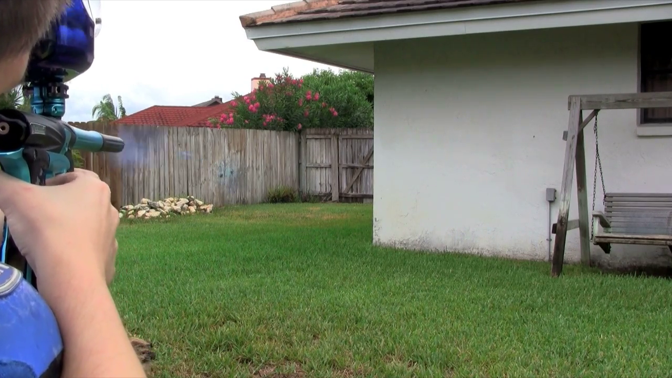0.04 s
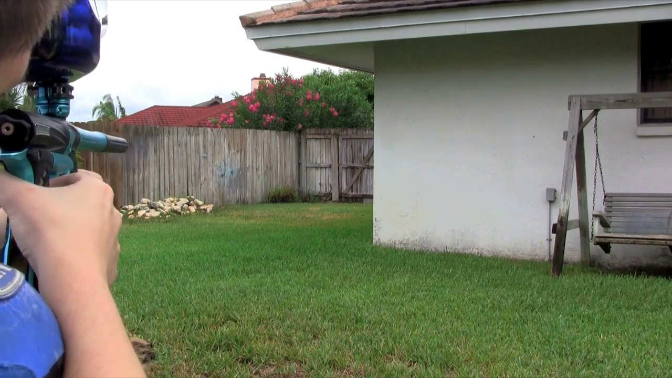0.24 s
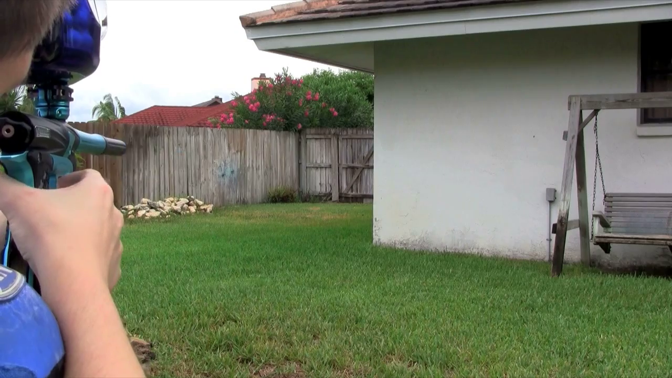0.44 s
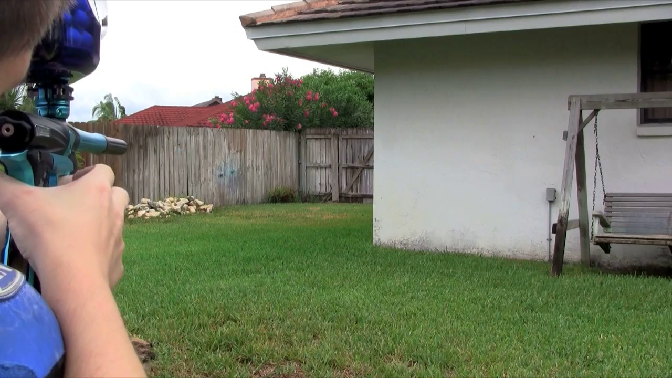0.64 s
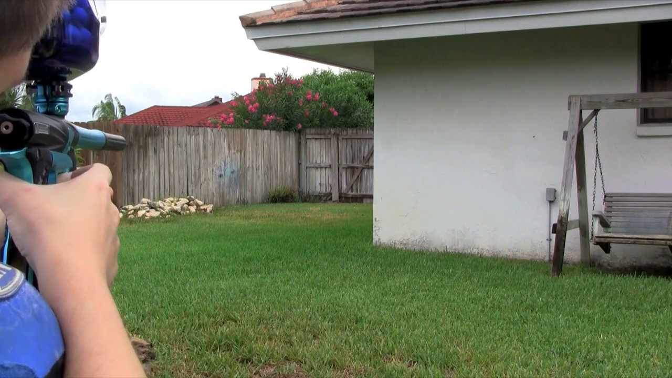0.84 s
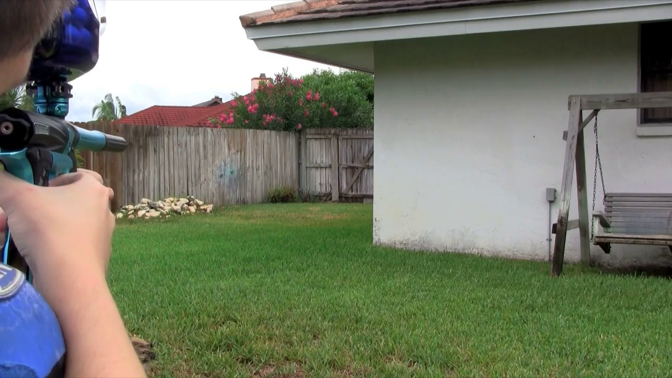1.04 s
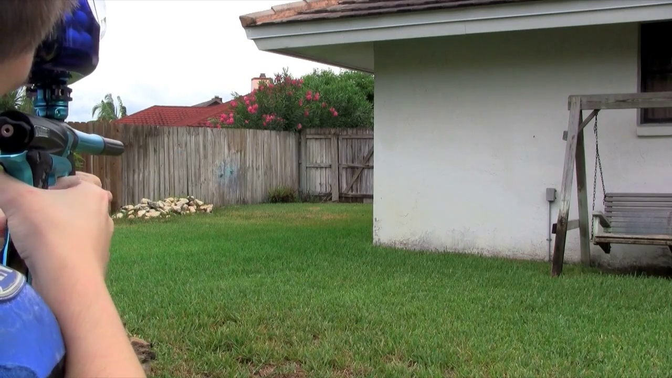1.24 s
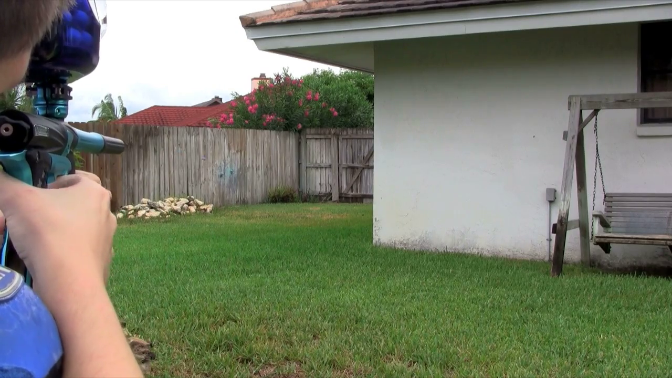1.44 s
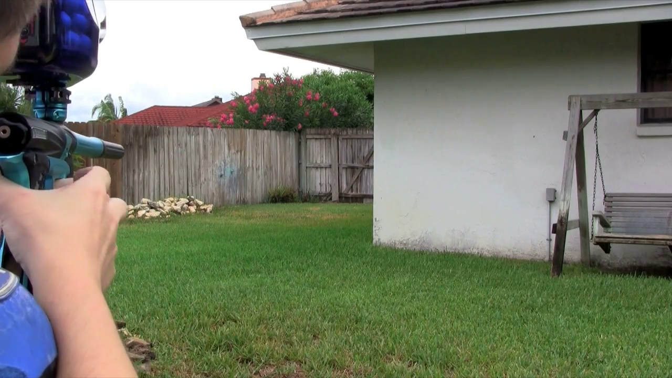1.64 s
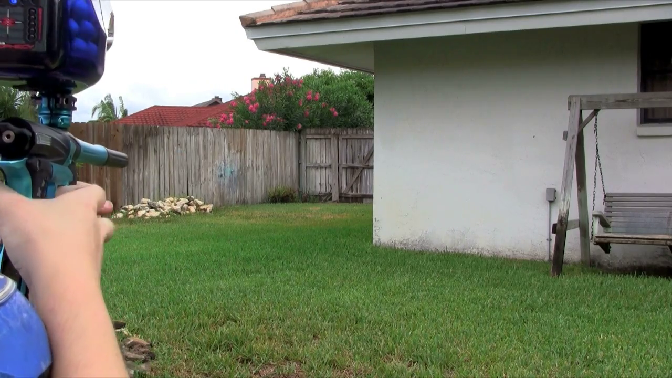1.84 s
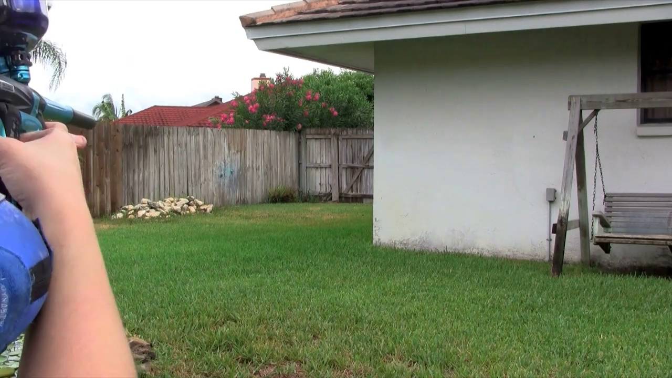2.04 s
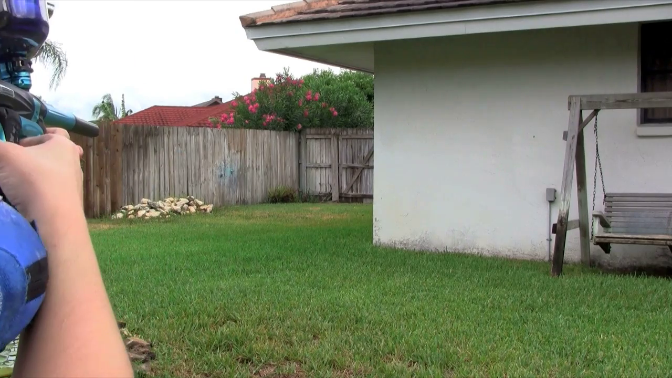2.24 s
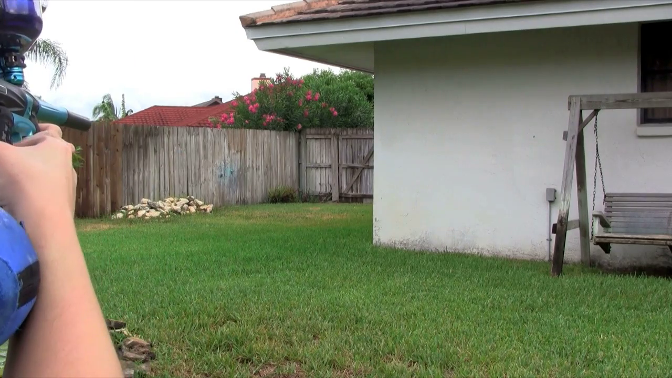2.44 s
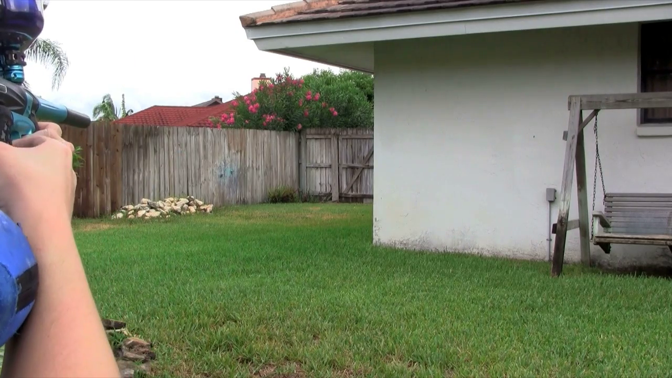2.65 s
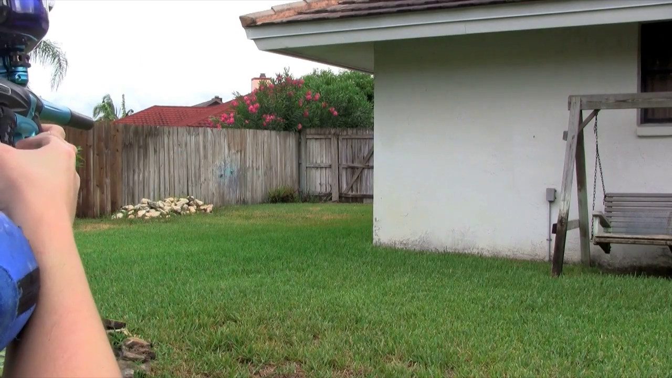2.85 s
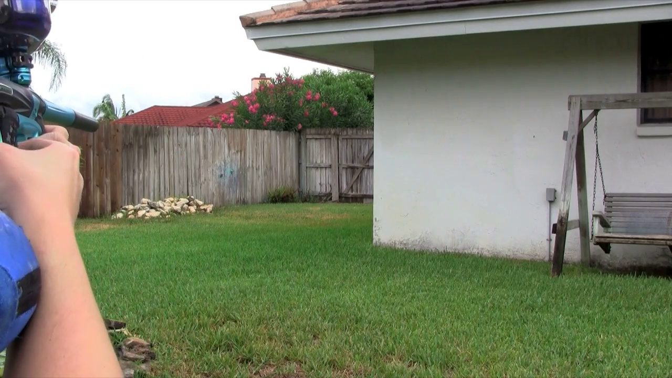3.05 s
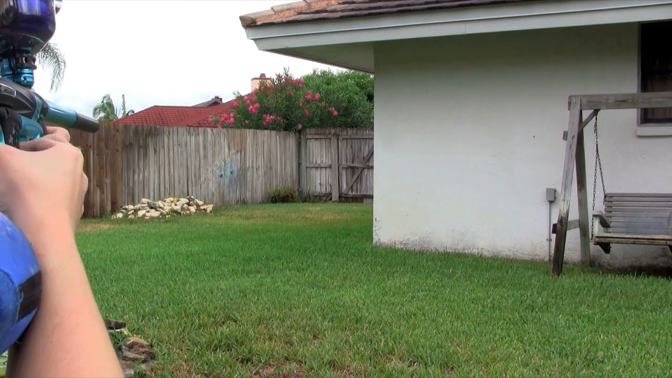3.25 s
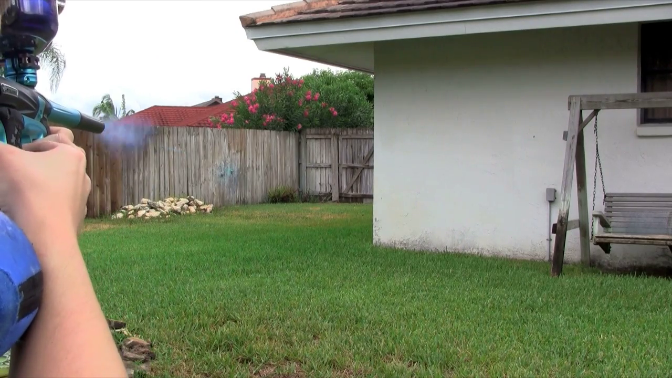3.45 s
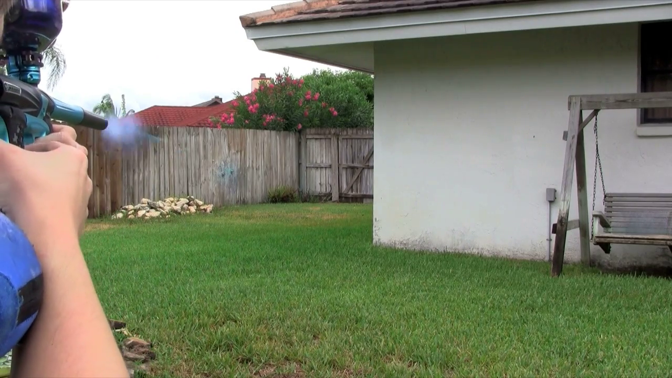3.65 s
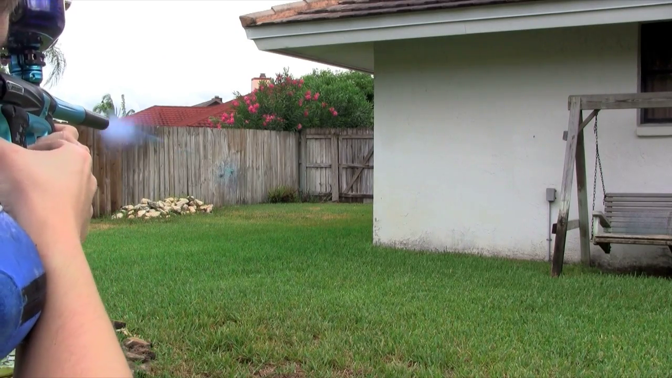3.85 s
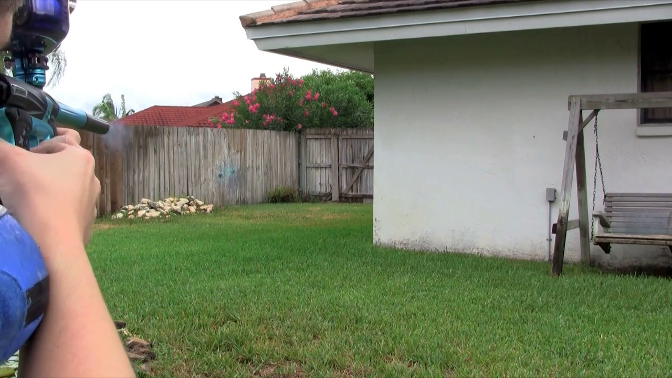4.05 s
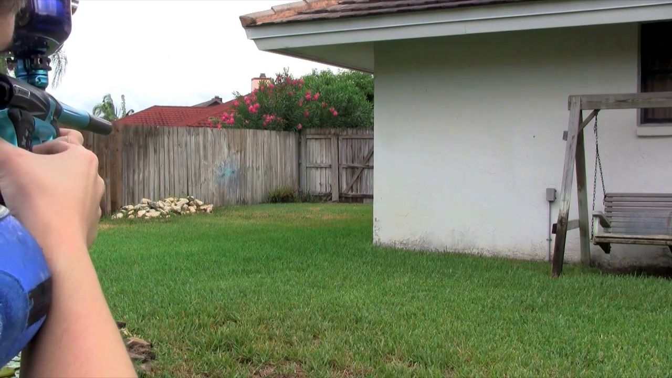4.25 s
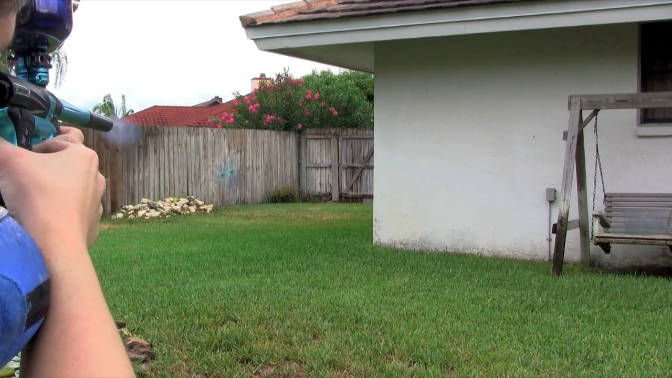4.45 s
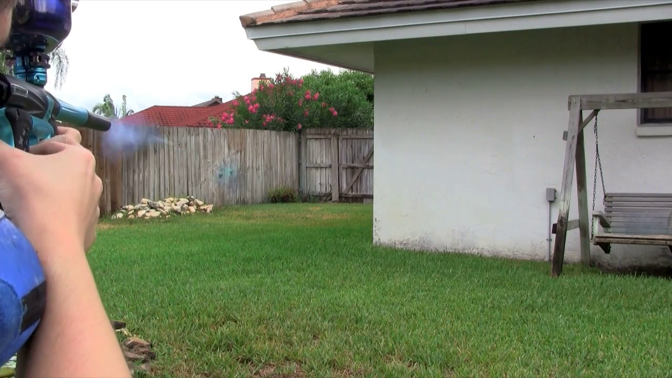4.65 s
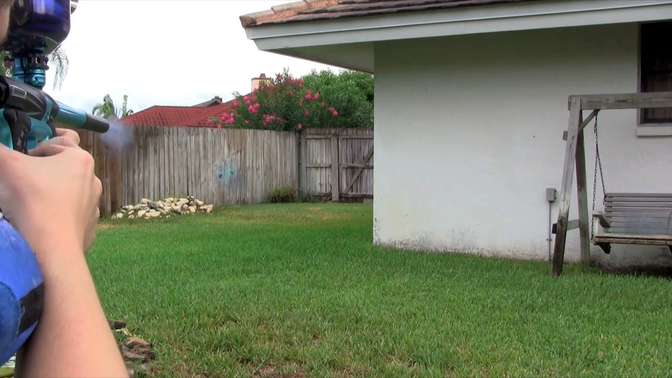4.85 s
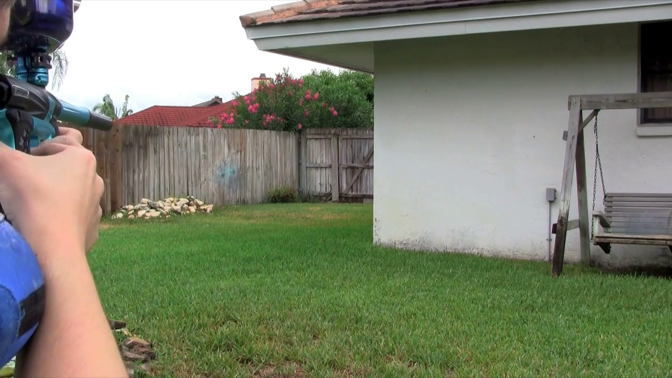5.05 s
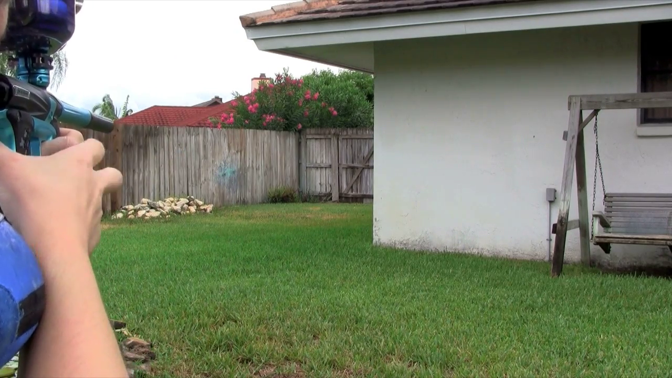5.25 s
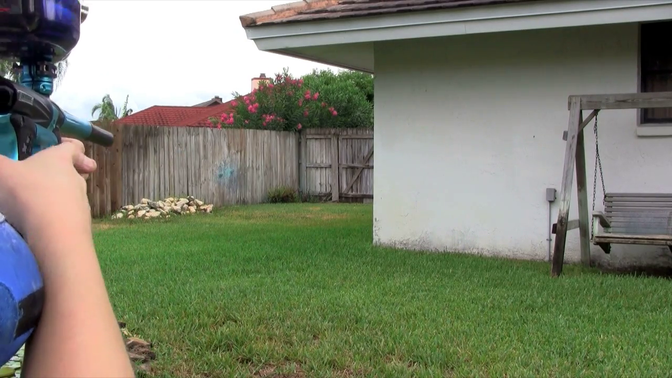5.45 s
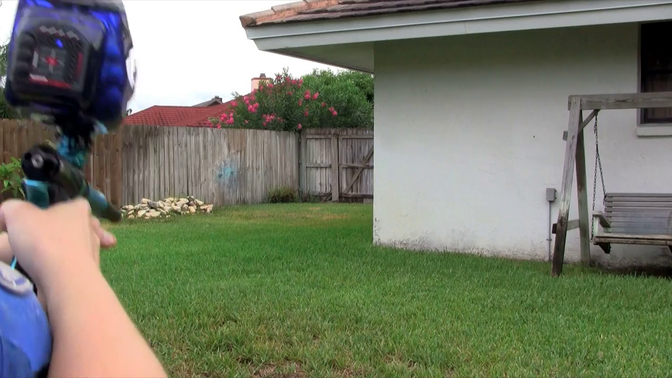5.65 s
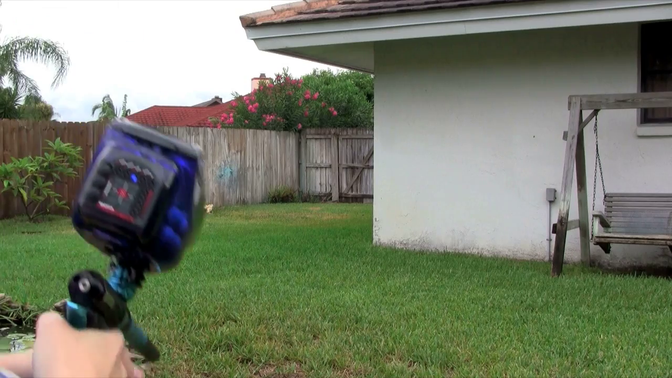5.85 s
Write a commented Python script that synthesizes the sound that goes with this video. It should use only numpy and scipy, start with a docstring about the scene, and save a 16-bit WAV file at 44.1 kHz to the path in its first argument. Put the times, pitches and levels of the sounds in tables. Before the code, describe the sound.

A close paintball marker fires a quick burst, two single shots and a long rapid string, with balls slapping a wooden fence farther off.

```python
"""Paintball marker in a backyard

Close by: a fast string, two single shots, a long string, then a rustle as the marker is lifted.
Per shot the bolt thumps forward and the valve vents a gas blast through the barrel; one flight time
later the ball slaps a wooden fence. House and fence reflect; a limiter ducks under each blast."""
import sys
import numpy as np
from scipy import signal
from scipy.fft import rfft, irfft
from scipy.io import wavfile
from scipy.ndimage import uniform_filter1d

SR = 44100
rng = np.random.default_rng(int(sys.argv[2]) if len(sys.argv) > 2 else 0)


def dump_mix(stems):
    """Bounce the given channels to the path in sys.argv[1] as a 16-bit WAV at rate SR."""
    frames = np.atleast_2d(stems).T  # one column per channel
    limited = np.clip(frames, -1, 1)  # hard clip at full scale
    pcm = np.round(limited * 32767).astype(np.int16)
    wavfile.write(sys.argv[1], SR, pcm)


N = 260612

# noise spectra: f/Hz, density/dB
AIR_SPECTRUM = [(150, -29), (250, -1), (348, -6), (476, 0), (890, -5), (971, -4.5), (1280, -6.5),
                (1400, -4.5), (1500, -9), (1880, -13.5), (2860, -16), (4410, -17), (5250, -21.5),
                (11300, -19), (16000, -40)]
RUMBLE_SPECTRUM = [(15, -44.5), (25, -29), (41, -26), (113, 3), (173, -3), (230, -7), (269, -12), (303, -9),
                   (350, -19), (460, -23), (770, -120)]
RUSTLE_SPECTRUM = [(88, -59), (150, -33), (249, -35), (291, -15), (457, -3.5), (624, -8.5), (1020, -5.5),
                   (1290, -9), (1530, -9.5), (1900, -21), (2700, -19.5), (4760, -35.5), (9080, -36.5),
                   (14000, -46), (16000, -85)]
SLAP_SPECTRUM = [(200, -27.5), (600, -12), (1400, -9.5), (2200, -0.5), (3400, -7), (6000, -14.5),
                 (9000, -4.5), (12000, -8), (16000, -20)]
GAS_SPECTRUM = [(30, -27), (200, -3), (450, 10.5), (800, -3), (1400, -2), (2100, -3.5), (3200, -4.5),
                (4300, -2), (5400, -8.5), (6700, -11), (8800, -2.5), (11000, -6), (13500, -10.5),
                (16000, -48)]
# yard scatter after a shot, after a fence hit: f/Hz, density/dB
SHOT_WASH_SPECTRUM = [(60, -13.5), (300, -1.5), (480, 3), (650, -10), (900, 1.5), (1150, -7), (1500, -8),
                      (2300, -15), (4300, -14), (6300, -17), (9000, -14.5), (12000, -16), (16000, -36)]
FENCE_WASH_SPECTRUM = [(100, -40), (380, -24), (600, -6), (900, 0.5), (1150, -2), (1400, 0.5),
                       (2000, -10.5), (3200, -12.5), (6000, -20.5), (9000, -17), (12000, -22), (16000, -40)]
# stereo width: f/Hz, side re mid/dB
STEREO_WIDTH = [(60, -14), (250, -7.5), (2000, -18.5), (4000, -14.5), (8500, -6), (12000, -1.5), (16000, 6)]
# outdoor bed: t/s, air level/dB, rumble level/dB
BED_LEVELS = [(0.9, -68.5, -58.5), (1.4, -44.5, -48.5), (2.35, -46, -48.5), (3.05, -47, -45.5),
              (5.5, -49, -56)]
# distant hum and whine: f/Hz, level/dB
HUM_TONES = [(118, -56.5), (1358, -56.5)]
# brief dropout: centre t/s, fade each way/s, floor/dB
LEVEL_DIP = (2.125, 0.087, -42)
# grip bumps while aiming: t/s, relative level/dB
GRIP_BUMPS = [(2.006, -28.5), (2.458, -28.5), (2.56, -34), (2.85, -31.5), (2.904, -33), (2.953, -24.5),
              (3.009, -24.5)]
# yard tail of earlier shots (first row), then marker rustles: t/s, length/s, rise/s, level/dB
NOISE_SWELLS = [(0.0, 0.062, 0.001, -24.5), (2.51, 0.01, 0.003, -41), (3.135, 0.14, 0.022, -32),
                (5.572, 0.4, 0.14, -25.5)]
# house and fence reflections: delay/s, gain/dB, low f/Hz, high f/Hz
REFLECTIONS = [(0.0403, -14.5, 5500, 13000), (0.041, -13.5, 4116, 4370), (0.052, -7, 850, 1014),
               (0.067, -21, 850, 1070)]
# prominent fence hits: t/s, relative level/dB
CLEAR_HITS = [(0.013, -12), (0.7026, -4.5), (0.814, -13), (0.9059, -10), (1.6722, -4.5), (1.8336, -6.5),
              (3.369, -5), (4.8883, -7), (5.5482, -7.5), (5.631, -10.5)]
# modes of fence boards, marker body, muzzle pop, emptied barrel: f/Hz, relative level/dB, T60/s
BOARD_MODES = [(215, -29.5, 0.099), (599, -17, 0.069), (697, -24.5, 0.087), (837, -19, 0.038),
               (998, -14.5, 0.068), (1398, -25, 0.031), (1655, -19.5, 0.066)]
BODY_MODES = [(184.6, -11, 0.013), (390, 3, 0.014), (645, -2, 0.013), (976, -4, 0.013), (1433, -12, 0.01)]
MUZZLE_MODES = [(270, -11, .016), (400, -7.5, 0.012), (655, -9.5, 0.022), (980, -11, 0.013),
                (1680, -25, 0.015)]
BARREL_MODES = [(134, -33, 0.059), (218, -18, 0.033), (403, -8.5, 0.04), (636, -24, 0.048),
                (850, -20.5, 0.039), (1235, -30, 0.03)]
# gas surges in one blast: t after valve opens/s, relative level/dB, decay/s
GAS_SURGES = [(0.0, -18, 0.0017), (.0015, -11, 0.003), (.0048, -8.5, 0.0014), (.0075, -17, 0.0028),
              (.0145, -15, 0.002)]
# bolt starts: t/s
SHOTS_S = [0.073, 0.1202, 0.1746, 0.2223, 0.2822, 0.3621, 0.4165, 0.532, 0.6246, 1.421, 1.5537, 3.088,
           3.3082, 3.405, 3.4854, 3.5825, 3.6637, 3.716, 3.789, 3.8381, 3.8891, 3.936, 3.9907, 4.056,
           4.1193, 4.2002, 4.295, 4.3562, 4.4354, 4.4854, 4.5413, 4.6, 4.6856, 4.732, 4.7861, 4.9315,
           5.0005, 5.074, 5.1559, 5.2649, 5.3452]


def from_db(db):
    """Decibels to gain."""
    return 10 ** (np.asarray(db) / 20)


def gain_at(points, hz):
    """Spectrum gain, interpolated over log frequency."""
    known_hz, db = np.transpose(points)
    return from_db(np.interp(np.log(hz + 1), np.log(known_hz), db))


def noise(spectrum):
    """Coloured stereo noise, widest in the treble, rms 1."""
    hz = np.fft.rfftfreq(N, 1 / SR)
    mid, side = rfft(rng.standard_normal((2, N)))
    width, gain = gain_at(STEREO_WIDTH, hz), gain_at(spectrum, hz)
    stereo = (mid + width * side * [[1], [-1]]) / np.sqrt(1 + width ** 2)
    return irfft(gain * stereo, N) / np.sqrt(np.mean(gain ** 2))


def impulses(times_s, db):
    """One-sample kicks."""
    out = np.zeros(N)
    np.add.at(out, np.clip(np.round(times_s * SR).astype(int), 0, N - 1), from_db(db))
    return out


def decay(kicks, decay_s):
    """Exponential tail on each kick, same height."""
    return signal.lfilter([1], [1, -np.exp(-1 / (decay_s * SR))], kicks + 1e-18)


def delayed(x, delay_s):
    """Whole-sample delay."""
    return np.pad(x, [(0, 0)] * (x.ndim - 1) + [(int(delay_s * SR), 0)])[..., :N]


def strike(modes, times_s, db, scatter_db):
    """Struck damped modes, alternating in sign; level scatters per blow and mode."""
    out = np.zeros(N)
    for k, (hz, mode_db, t60_s) in enumerate(modes):
        radius, step_rad = from_db(-60 / (t60_s * SR)), 2 * np.pi * hz / SR
        feedback = [1, -2 * radius * np.cos(step_rad), radius ** 2]
        kicks = impulses(times_s, db + mode_db + scatter_db * rng.standard_normal(len(times_s)))
        out += (-1) ** k * signal.lfilter([0, np.sin(step_rad)], feedback, kicks + 1e-18)
    return out


def low_cut(x, hz):
    """Second-order high-pass."""
    return signal.sosfilt(signal.butter(2, hz, "high", fs=SR, output="sos"), x)


def background():
    """Outdoor air, low rumble, hum of a far machine."""
    t = np.arange(N) / SR
    knots_s, air_db, rumble_db = np.transpose(BED_LEVELS)
    hum = 0
    for hz, db in HUM_TONES:
        drift_rad = 0.015 * np.cumsum(rng.standard_normal(N))
        hum += from_db(db) * np.sqrt(2) * np.sin(2 * np.pi * hz * t + drift_rad)
    air = from_db(np.interp(t, knots_s, air_db)) * noise(AIR_SPECTRUM)
    rumble = from_db(np.interp(t, knots_s, rumble_db)) * noise(RUMBLE_SPECTRUM)
    return air + rumble + hum


def grip_bumps(bump_s=0.0093):
    """Soft bumps of the hand on the grip."""
    kicks = impulses(*np.transpose(GRIP_BUMPS))
    return uniform_filter1d(decay(kicks, bump_s), size=300) * noise(RUMBLE_SPECTRUM)


def noise_swells(grains_per_s=220, grain_s=0.0016, release_s=0.02):
    """Yard still ringing from earlier shots at the start, then rustles as the marker moves."""
    t = np.arange(N) / SR
    envelope = 0
    for start_s, length_s, rise_s, db in NOISE_SWELLS:
        rise = np.clip((t - start_s) / rise_s, 0, 1)
        release = np.exp(-np.maximum(t - start_s - length_s, 0) / release_s)
        envelope += from_db(db) * rise * release
    grain_power = decay(rng.random(N) < grains_per_s / SR, grain_s) + 0.39  # steady floor
    return envelope * np.sqrt(grain_power / np.mean(grain_power)) * noise(RUSTLE_SPECTRUM)


def yard_wash(x, spectrum, wet_db, build_s, early_t60_s, late_t60_s, late_db):
    """Scattered paths add in power: build-up, fast decay, faint tail from far houses."""
    t = np.arange(SR) / SR
    build = 1 - np.exp(-(t / build_s) ** 2)
    tail = from_db(-60 * t / early_t60_s) + from_db(late_db - 60 * t / late_t60_s)
    response = (build * tail) ** 2
    power = signal.fftconvolve(np.mean(x ** 2, axis=0), response / np.sum(response))[:N]
    return from_db(wet_db) * np.sqrt(np.maximum(power, 0)) * noise(spectrum)


def echoes(x):
    """Discrete reflections: bright off wall and eaves, narrow and woody off the fence."""
    out = 0
    for delay_s, db, low_hz, high_hz in REFLECTIONS:
        band = signal.butter(1, [low_hz, high_hz], "band", fs=SR, output="sos")
        out += from_db(db) * signal.sosfilt(band, delayed(x, delay_s))
    return out


def landings(flight_s=0.283, spread_s=0.003, hit_db=-10, spread_db=0.5, gap_s=0.04):
    """Hit times and levels: the prominent hits, plus each shot's ball unless one is within gap_s."""
    clear_s, clear_db = np.transpose(CLEAR_HITS)
    lateness, hardness = rng.standard_normal((len(SHOTS_S), 2)).T
    hits_s = np.array(SHOTS_S) + flight_s + spread_s * lateness
    hits_db = hit_db + spread_db * hardness
    apart = np.min(abs(hits_s[:, None] - clear_s), axis=1) > gap_s
    return np.append(clear_s, hits_s[apart]), np.append(clear_db, hits_db[apart])


def fence_hits(slap_db=-1, boards_db=-7, rebound_s=0.035, rebound_db=-2, echo_s=0.02, echo_db=-11):
    """Ball bursts; loose boards ring and knock back on their rail; the house wall echoes the slap."""
    hits_s, db = landings()
    slap = decay(impulses(hits_s, db + slap_db), decay_s=0.0017) * noise(SLAP_SPECTRUM)
    rebounds_s = hits_s + rebound_s * rng.uniform(0.8, 1.2, len(hits_s))
    boards = strike(BOARD_MODES, hits_s, db + boards_db, scatter_db=8.5)
    rebounds = strike(BOARD_MODES, rebounds_s, db + rebound_db, scatter_db=5)
    return slap + from_db(echo_db) * delayed(slap, echo_s) + boards + rebounds


def bolt(gain_db=1.5, trigger_lead_s=0.0094, stop_lag_s=0.00567):
    """Trigger ticks; bolt drives forward with clack, thump and hiss, then knocks at its stop."""
    starts_s = np.array(SHOTS_S)
    thump = -strike(BODY_MODES, starts_s, db=0, scatter_db=2.5)
    knock = -strike(BODY_MODES, starts_s + stop_lag_s, db=-11, scatter_db=1)
    slide = decay(impulses(starts_s, db=-28), decay_s=0.052) * noise(GAS_SPECTRUM)
    trigger = decay(impulses(starts_s - trigger_lead_s, db=-35), decay_s=0.0056)
    clack = decay(impulses(starts_s, db=-15), decay_s=0.0048)
    body = low_cut(thump + knock + slide, hz=115)  # small source, little bass
    return from_db(gain_db) * (body + (trigger + clack) * noise(SLAP_SPECTRUM))


def valve_times(wait_s=0.0126, extra_wait_s=0.0055, recovery_s=0.03):
    """Valve opens after the bolt starts; later when the last shot was only just fired."""
    since_last_s = np.diff(SHOTS_S, prepend=-1)
    return np.array(SHOTS_S) + wait_s + extra_wait_s * np.exp(-since_last_s / recovery_s)


def blast(gain_db=16, pop_lag_s=0.00095, shock_lag_s=0.0053, ring_after_pop_s=0.0074):
    """Regulated gas leaves in hissing surges: muzzle pop, sharp shock, pipe ring of the barrel."""
    opens_s = valve_times()
    scatter_db = rng.standard_normal((len(opens_s), len(GAS_SURGES)))
    hiss_power = sum(decay(impulses(opens_s + lag_s, db + scatter_db[:, k]), decay_s) ** 2
                     for k, (lag_s, db, decay_s) in enumerate(GAS_SURGES))
    pop = -strike(MUZZLE_MODES, opens_s + pop_lag_s, db=0, scatter_db=1)
    shock = -decay(impulses(opens_s + shock_lag_s, db=2), decay_s=0.000096)
    ring = strike(BARREL_MODES, opens_s + pop_lag_s + ring_after_pop_s, db=0, scatter_db=0)
    hiss = np.sqrt(hiss_power) * noise(GAS_SPECTRUM)
    return from_db(gain_db) * low_cut(hiss + pop + shock + ring, hz=139)


def dip():
    """The level dips briefly."""
    centre_s, fade_s, floor_db = LEVEL_DIP
    return np.clip(abs(np.arange(N) / SR - centre_s) / fade_s, from_db(floor_db), 1)


def scene(left_db=-0.57):
    """Marker close and nearly dry; far fence with much more yard wash."""
    marker = (bolt() + blast()) * from_db([[left_db], [0]])
    fence = fence_hits()
    shot_wash = yard_wash(marker, SHOT_WASH_SPECTRUM, wet_db=-16.5, build_s=0.017,
                          early_t60_s=0.13, late_t60_s=0.66, late_db=-22.5)
    fence_wash = yard_wash(fence, FENCE_WASH_SPECTRUM, wet_db=-3, build_s=0.0058,
                           early_t60_s=0.15, late_t60_s=0.9, late_db=-9)
    firing = marker + fence + shot_wash + fence_wash + echoes(marker)
    return (firing + grip_bumps() + noise_swells() + background()) * dip()


def limiter(x, threshold_db=-5, release_s=0.13, treble_weight=2.413,
            memory_s=0.37, memory_share=0.78, memory_start_db=12, makeup_db=0.85):
    """Fast attack, keener on treble, slow release; sustained fire holds the gain down longer."""
    sensed = x + treble_weight * np.diff(x, prepend=0)
    power = uniform_filter1d(np.mean(sensed ** 2, axis=0), size=176)
    over_db = np.maximum(10 * np.log10(np.maximum(power, 1e-12)) - threshold_db, 1e-6)
    age = np.arange(N) / SR / release_s
    held_db = np.exp(np.maximum.accumulate(np.log(over_db) + age) - age)  # decaying peak hold
    pole = np.exp(-1 / (memory_s * SR))
    memory_db, _ = signal.lfilter([1 - pole], [1, -pole], held_db, zi=[memory_start_db])
    reduction_db = uniform_filter1d(np.hypot(held_db, memory_share * memory_db), size=44)
    return x * from_db(makeup_db - reduction_db)


def record(dry, clip_level=0.92, cutoff_hz=16100):
    """Limiter, low cut, hard clip, steep top cut."""
    clipped = np.clip(low_cut(limiter(dry), hz=22), -clip_level, clip_level)
    top_cut = signal.ellip(10, 0.2, 80, cutoff_hz, fs=SR, output="sos")
    return signal.sosfilt(top_cut, clipped)


dry = scene()
out = record(dry)
dump_mix(out)
```